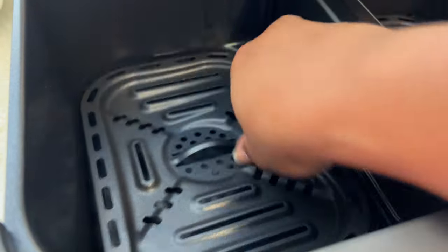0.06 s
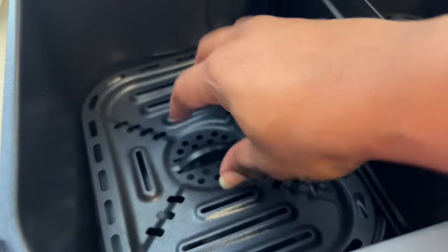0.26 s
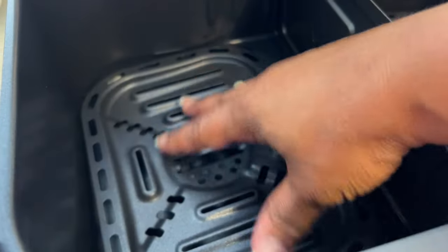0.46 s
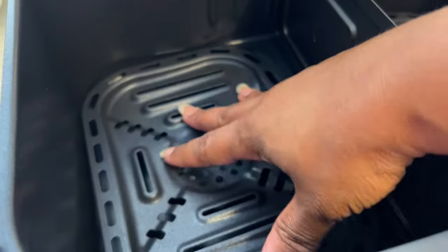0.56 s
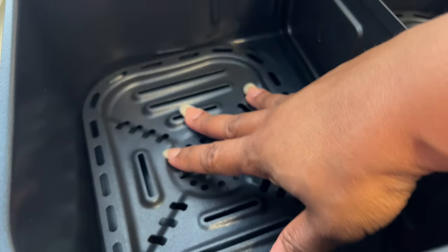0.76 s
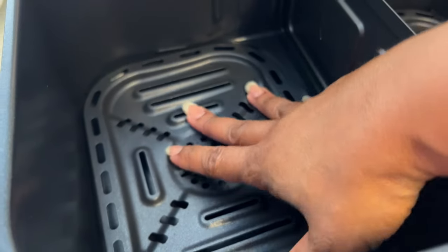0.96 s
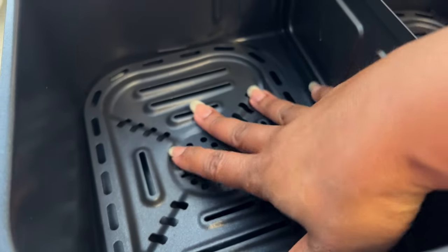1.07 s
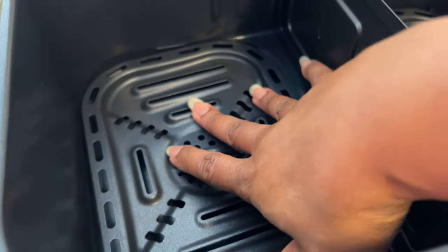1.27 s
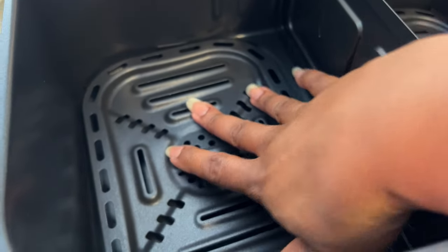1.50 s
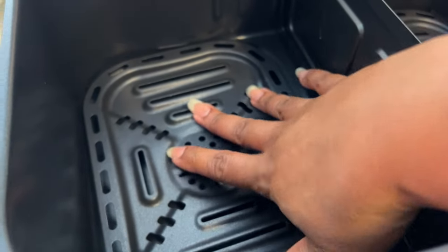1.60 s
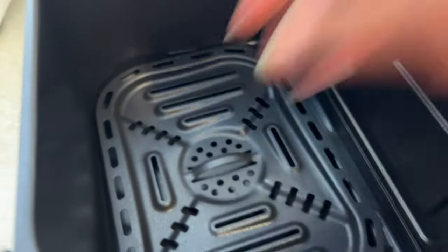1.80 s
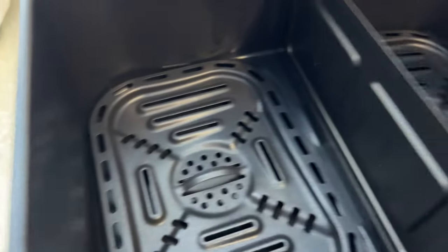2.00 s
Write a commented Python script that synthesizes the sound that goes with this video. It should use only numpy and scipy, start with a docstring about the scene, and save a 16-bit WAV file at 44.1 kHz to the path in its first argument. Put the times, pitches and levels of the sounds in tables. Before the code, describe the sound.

A perforated metal plate drops into a plastic basket with one deep, dull thump, then nails tick and scuff on it, soft presses follow, and a small knock ends it; quiet kitchen, close stereo microphone.

```python
"""Metal plate pressed into a basket

A hand lets a perforated metal plate drop into a plastic basket, then presses it home with spread fingers.
The basket thumps, knocks and rumbles as decaying sines; nails and scuffs ring the plate's faint modes.
Sliding skin is grainy filtered noise. Quiet kitchen tone, picked up close by a microphone with two ports.
"""
import sys
import numpy as np
from scipy import signal
from scipy.fft import rfft, irfft
from scipy.io import wavfile
from scipy.ndimage import uniform_filter1d

SR = 44100
rng = np.random.default_rng(int(sys.argv[2]) if len(sys.argv) > 2 else 0)


def undo_db(level):
    """Turn decibels back into plain size, where 20 dB means ten times bigger."""
    steps = np.asarray(level, float) / 20
    return 10 ** steps


def master(y):
    """Save y as 16-bit WAV."""
    cut = np.clip(np.atleast_2d(y).T, -1, 1)
    pcm = np.round(cut * 32767)  # scale
    wavfile.write(sys.argv[1], SR, pcm.astype(np.int16))


N = 90228  # length in samples


def evened(x):
    """Scales a sound to rms 1."""
    return x / np.sqrt(np.mean(x ** 2) + 1e-20)


def read_spectrum(points, hz):
    """Reads a curve of (frequency, dB) points on a log-frequency axis."""
    point_hz, point_db = np.transpose(points)
    return np.interp(np.log(hz + 1), np.log(point_hz + 1), point_db)


def level_curve(start_s, level_db):
    """Straight lines in dB between the given times, one value per sample."""
    return np.interp(np.arange(N) / SR, start_s, level_db)


def add(mix, start_s, sound):
    """Mixes a sound in at its start time, cutting what runs past the end."""
    part = mix[round(start_s * SR):][:len(sound)]
    part += sound[:len(part)]


def coloured(x, spectrum, tilt_db=0.):
    """Gives x a spectrum, tilted by some dB per octave about 4 kHz; rms 1."""
    hz = np.fft.rfftfreq(len(x), 1 / SR)
    gain_db = read_spectrum(spectrum, hz) + tilt_db * np.log2((hz + 50) / 4000)
    return evened(irfft(rfft(x) * undo_db(gain_db), len(x)))


def grains(size, grain_db):
    """Dense noise whose samples are sometimes large, like friction on a rough coating."""
    return rng.standard_normal(size) * undo_db(grain_db * np.minimum(rng.exponential(1, size), 5))


def ringing(modes, extra_db, ring_share=1., rise_cycles=.1):
    """Sum of dying sines, one per mode, each swelling over some of its own cycles."""
    t = np.arange(SR // 2) / SR
    hz, level_db, t60_s = np.transpose(modes)[:, :, None]
    swell = 1 - np.exp(-t * hz / rise_cycles)
    decay = undo_db(level_db + extra_db[:, None] - 60 * t / (ring_share * t60_s))
    return (swell * decay * np.sin(2 * np.pi * hz * t)).sum(0)


def blows(table, modes):
    """A blow rings an object's modes, most of all those near its centre frequency."""
    out, hz = np.zeros(N), np.transpose(modes)[0]
    for start_s, level_db, centre_hz, spread_octaves, *touch in table:
        focus_db = -6 * (np.log2(hz / centre_hz) / spread_octaves) ** 2
        add(out, start_s, undo_db(level_db) * ringing(modes, focus_db, *touch))
    return out


def thump():
    """The basket floor bends under the drop: one dull note that falls as the floor slackens."""
    start_s, level_db, rise_s, t60_s = .058, -12.5, .0034, .28
    from_hz, to_hz, fall_s = 230, 66.5, .014
    out, t = np.zeros(N), np.arange(SR // 4) / SR
    hz = to_hz + (from_hz - to_hz) * np.exp(-t / fall_s)
    envelope = (1 - np.exp(-t / rise_s)) * undo_db(level_db - 60 * t / t60_s)
    add(out, start_s, envelope * np.sin(2 * np.pi * np.cumsum(hz) / SR))
    return out


# Resonances of the plastic basket ringing freely: pitch_hz, level_db, t60_s
BASKET_MODES = [(69.5, -3.5, 0.64), (97.5, -3, 0.35), (113, -3.5, 0.57), (156, -2, .3), (188, -2, .15),
                (223, 0, .5), (285.3, -2.5, 0.27), (310, -1, 0.29), (358.2, -3.5, 0.23), (396.1, -5, 0.34),
                (437, -23.5, 0.15), (532.6, -13, 0.42), (766, -5.5, 0.083), (1030, -2.5, 0.054)]
# Knocks on the basket: start_s, level_db, centre_hz of the modes struck, spread_octaves,
# ring_share (part of the free ring time), rise_cycles
BASKET_KNOCKS = [(.058, -20.5, 211, 1.25, 0.97, 1.23), (.063, -12, 217, 0.15, 0.19, 1),
                 (.888, -38.5, 1030, 0.087, 0.75, 0.64), (.888, -40, 440, 0.13, 0.27, 1),
                 (.925, -41, 610, 0.96, 0.59, 2), (.895, -27.5, 415, 0.42, 0.22, 2.2),
                 (.904, -33, 310, 0.24, 0.35, 0.56), (.988, -43.5, 1030, 0.19, 1.35, 1.1),
                 (.998, -44.5, 344, 0.18, 0.3, 0.35), (1.398, -41, 213, 0.69, 0.57, 1.3),
                 (2.011, -20, 321, 0.29, 0.58, 1.3)]


def knocks():
    """Each knock rings the basket modes near its centre, shortened or lengthened by the touch."""
    return blows(BASKET_KNOCKS, BASKET_MODES)


# The basket shifting under the hand, in two runs of points: start_s, low_rumble_db, upper_rumble_db
BASKET_SHIFTS = [
    [(0.0, -87, -54), (0.02, -56, -37.5), (0.04, -54, -50)],
    [(0.26, -42.5, -62.5), (0.342, -49, -55.5), (0.434, -37.5, -47), (0.594, -53.5, -67), (0.628, -65, -55),
     (0.764, -59.5, -63), (0.87, -58, -60), (0.904, -87, -47), (0.972, -87, -53.5), (1.0, -49.5, -46.5),
     (1.146, -70, -75.5), (1.242, -75.5, -77.5), (1.418, -52.5, -45.5), (1.462, -50, -62),
     (1.602, -81, -64), (1.636, -54, -74), (1.708, -78, -73), (1.752, -90, -57.5), (1.83, -70.5, -62.5),
     (1.888, -75, -78), (1.994, -69, -64.5), (2.0, -58.5, -68)],
]


def rumble():
    """Random pushes of the hand keep the damped basket modes going, low and upper modes apart."""
    split_hz, ring_share = 159, .33
    start_s, low_db, upper_db = np.concatenate(BASKET_SHIFTS).T
    low = np.transpose(BASKET_MODES)[0] < split_hz
    out = np.zeros(N)
    for part, level_db in ((low, low_db), (~low, upper_db)):
        body = ringing(BASKET_MODES, np.where(part, 0, -200), ring_share)  # -200 dB mutes the others
        pushes = rng.standard_normal(N + SR // 2)
        shaken = evened(signal.fftconvolve(pushes, body, "valid")[:N])
        out += undo_db(level_curve(start_s, level_db)) * shaken
    return out


# Resonances of the perforated metal plate ringing freely: pitch_hz, level_db, t60_s
PLATE_MODES = [(700, -1, .12), (1500, -8, .1), (2048, -1, .08), (2670, -5, .15), (2787, -3, .42),
               (2977, -6, .13), (3151, -13, .5), (3282, -2, .15), (3576, -7, .15), (3710, 1, .26),
               (3865, -5, .09), (4005, -6, .1), (4450, -3, .1), (4683, -2, .2), (5050, -4, .07),
               (5371, -4, .15), (6180, -6, .1), (6750, -3, .06), (7095, -6, .15), (7542, -4, .09),
               (8500, -4, .1), (8650, -4, .08), (9050, 0, .3), (9370, -5, .08)]
# Nails touching the plate: start_s, level_db, centre_hz of the modes struck, spread_octaves,
# ring_share (part of the free ring time)
NAIL_PINGS = [(.316, -57, 4500, .8, .5), (.357, -47, 5500, 1.8, .6), (.368, -44, 1800, 1.4, .6),
              (.406, -42, 5000, 2.8, .9), (.408, -42, 800, .6, .6), (.485, -47, 2750, .12, .8),
              (.745, -44, 4900, .15, .4), (1.655, -46, 3150, .03, .6), (1.762, -54.5, 3150, .03, 1.2)]


def pings():
    """Nails strike the plate and ring the modes near each ping's centre."""
    return blows(NAIL_PINGS, PLATE_MODES)


def held_plate(extra_db):
    """The plate modes, cut short by the hand resting on the metal."""
    longest_t60_s = .06
    damped = [(hz, level_db, min(t60_s, longest_t60_s)) for hz, level_db, t60_s in PLATE_MODES]
    return ringing(damped, extra_db)


# Spectrum of rubbing on the plate as the microphone hears it, before any tilt:
# pitch_hz, level_db (per Hz)
RUB_SPECTRUM = [(300, -30), (700, -14), (1300, -14), (3000, -5), (4600, -3), (5800, -8), (8800, 0),
                (10100, -4), (10600, -20), (12000, -15), (13900, -28), (15300, -14), (15900, -18),
                (16200, -60)]
# Nails and rim scuffing: start_s, level_db, hold_s, t60_s, tilt_db (per octave)
PLATE_SCUFFS = [(0.056, -40.5, 0.0024, 0.16, -6.5), (0.314, -48.5, 0.0068, 0.07, 2),
                (0.355, -38, 0.025, 0.051, 2.8), (0.397, -34, 0.0093, 0.044, 6.5),
                (0.403, -37, 0.0093, 0.082, 5), (0.476, -49, 0.011, 0.13, -2.5),
                (0.612, -62, 0.012, 0.084, -6), (0.742, -48.5, 0.021, 0.0083, 8),
                (0.879, -44, 0.0078, 0.08, 17), (0.885, -48.5, 0.0021, 0.22, -8),
                (0.99, -50, 0.0088, 0.12, -11), (1.382, -60.5, 0.015, 0.063, -7.5),
                (2.021, -51.5, 0.077, 0.12, 2.1)]


def scuffs():
    """A grainy burst holds, then dies; part of it sounds through the damped plate modes."""
    rise_s, grain_db = .001, 2.6
    metal_db = -2  # plate sound relative to the rub
    uneven_db = 5  # random spread: each scuff favours other modes
    out, t = np.zeros(N), np.arange(SR // 4) / SR
    for start_s, level_db, hold_s, t60_s, tilt_db in PLATE_SCUFFS:
        shape = np.minimum(t / rise_s, 1) * undo_db(-60 * np.maximum(t - hold_s, 0) / t60_s)
        rub = undo_db(level_db) * shape * coloured(grains(len(t), grain_db), RUB_SPECTRUM, tilt_db)
        plate = held_plate(uneven_db * rng.standard_normal(len(PLATE_MODES)))
        rung = signal.fftconvolve(rub, plate)
        add(out, start_s, rub)
        add(out, start_s, undo_db(metal_db) * rung * np.linalg.norm(rub) / np.linalg.norm(rung))
    return out


# Level of the skin sliding on the coating, before catch and slip: start_s, level_db
SKIN_SLIDE = [(0, -47.5), (0.132, -54), (0.157, -63), (.3, -70), (.46, -52.5), (.53, -64.5), (.6, -66.5),
              (.72, -72.5), (0.85, -67.5), (0.872, -51.5), (.94, -60), (.96, -70), (1.022, -58.5),
              (1.069, -63.5), (1.119, -75), (1.22, -73.5), (1.24, -88.5), (1.36, -80.5), (1.4, -69),
              (1.48, -70), (1.531, -63.5), (1.592, -86.5), (1.614, -62.5), (1.621, -57), (1.652, -55),
              (1.686, -62), (1.71, -61.5), (1.765, -58), (1.776, -70), (1.851, -86.5), (1.947, -86),
              (2.02, -61)]


def skin():
    """Soft hiss of fingers that catch and slip; part of it whistles in the plate modes."""
    grain_db, tilt_db = 2.5, 2.1  # tilt per octave
    metal_db = -3  # plate sound relative to the hiss
    catch_db, catch_s = 1.5, .0054  # rms swing of the level, and the time it is smoothed over
    catch = catch_db * evened(uniform_filter1d(rng.standard_normal(N), round(catch_s * SR)))
    hiss = coloured(grains(N, grain_db), RUB_SPECTRUM, tilt_db)
    plate = held_plate(np.zeros(len(PLATE_MODES)))
    rung = evened(signal.fftconvolve(hiss, plate)[:N])
    return undo_db(level_curve(*np.transpose(SKIN_SLIDE)) + catch) * (hiss + undo_db(metal_db) * rung)


# Spectrum of the quiet kitchen, relative levels: pitch_hz, level_db (per Hz)
ROOM_SPECTRUM = [(15, -53), (25, -23.5), (80, 8), (269, 5), (600, -28.5), (1770, 1.5), (3380, -18.5),
                 (8800, -46), (10500, -69.5), (12000, -18), (15600, -82), (22000, -120)]


def room_tone():
    """Steady noise with the spectrum of the quiet kitchen."""
    return undo_db(-72.5) * coloured(rng.standard_normal(N), ROOM_SPECTRUM)


# Balance of the two ports: pitch_hz, level_db (left minus right)
PORT_BALANCE = [(60, -1.4), (150, -3.5), (380, -1.6), (950, -2.5), (2380, 1), (5980, -5.5), (15000, 11.5)]
# Wall echoes that differ between the ports: pitch_hz, level_db
WALL_ECHOES = [(60, -25), (130, -19.5), (290, -20), (640, -10.5), (1410, 0), (3100, -1), (6820, -4),
               (15000, 2.5)]


def ports(x):
    """Two close ports: a small lag, a balance, and short wall echoes of opposite sign."""
    lag_s, echo_t60_s = 1.4e-5, .029  # the left port hears later
    t = np.arange(4096) / SR
    size = N + len(t)
    hz = np.fft.rfftfreq(size, 1 / SR)
    echo = rng.standard_normal(len(t)) * undo_db(-60 * t / echo_t60_s)
    echo = rfft(echo / np.linalg.norm(echo), size)
    side = np.array([[.5], [-.5]])  # left, right
    direct = np.exp(-2j * np.pi * side * hz * lag_s) * undo_db(side * read_spectrum(PORT_BALANCE, hz))
    walls = 2 * side * undo_db(read_spectrum(WALL_ECHOES, hz)) * echo
    return irfft(rfft(x, size) * (direct + walls), size)[:, :N]


def scene():
    """Basket, plate, fingers and kitchen tone, all heard through the two ports."""
    basket = thump() + knocks() + rumble()
    plate = pings() + scuffs()
    return ports(basket + plate + skin() + room_tone())


def top_cut(x):
    """Nothing passes above the cut-off."""
    return signal.sosfilt(signal.butter(12, 17030, fs=SR, output="sos"), x)


def record(dry):
    """The microphone drops the deep bass."""
    low_cut = signal.butter(3, 45, "high", fs=SR, output="sos")  # Hz
    mix = signal.sosfilt(low_cut, dry)
    return top_cut(mix)


dry = scene()
out = record(dry)
master(out)
```